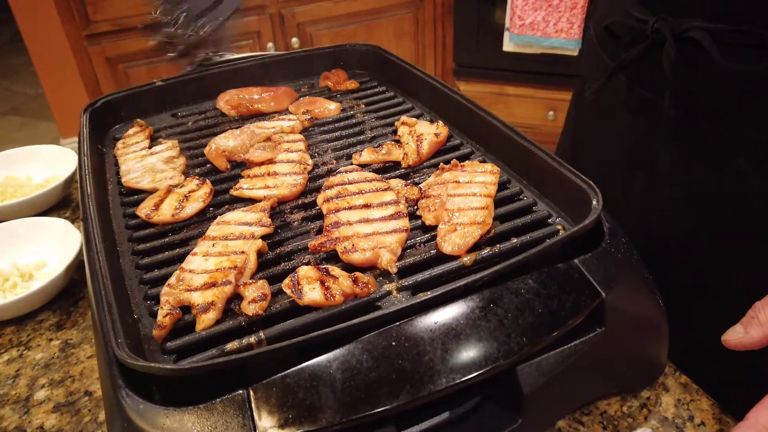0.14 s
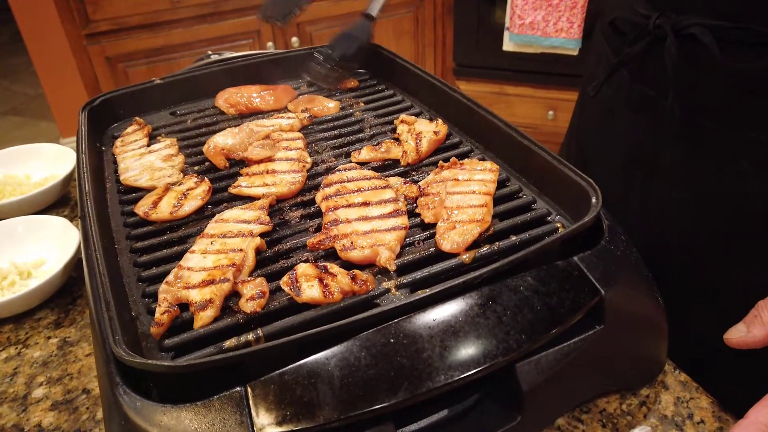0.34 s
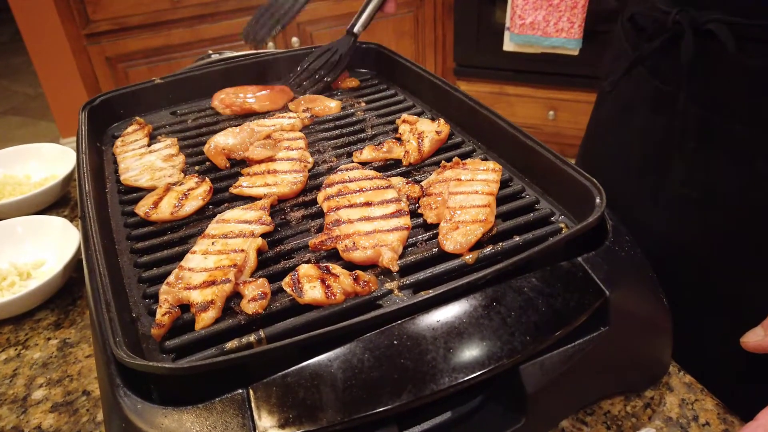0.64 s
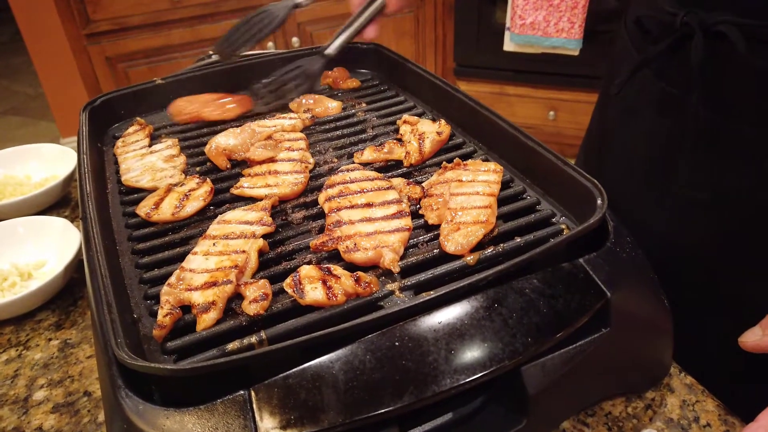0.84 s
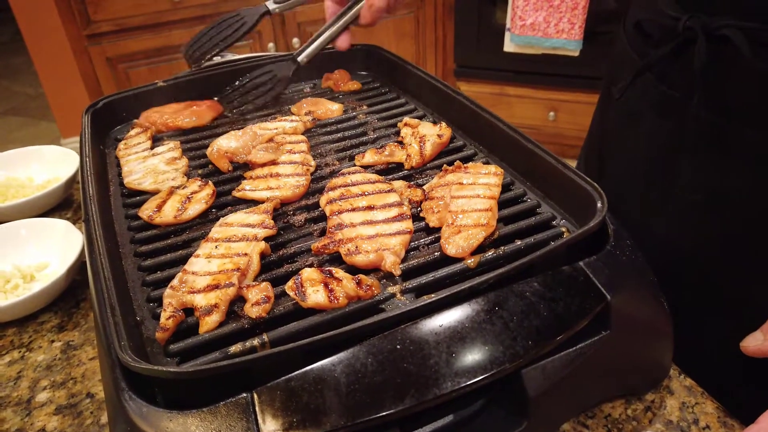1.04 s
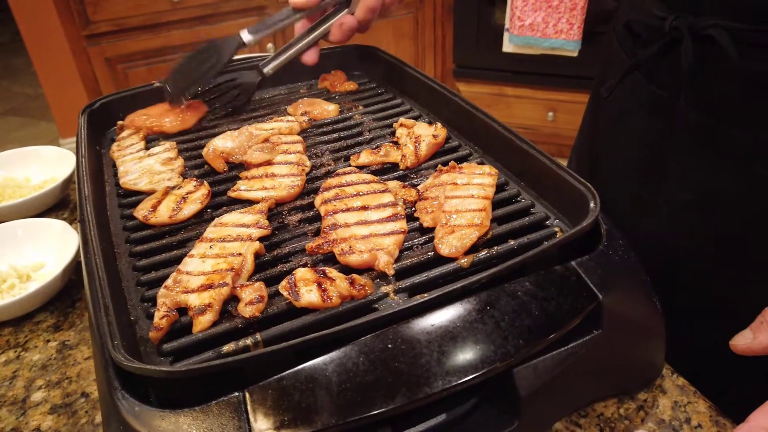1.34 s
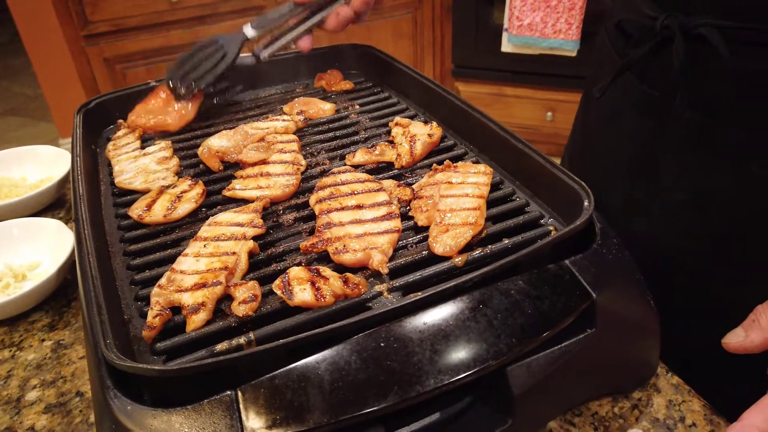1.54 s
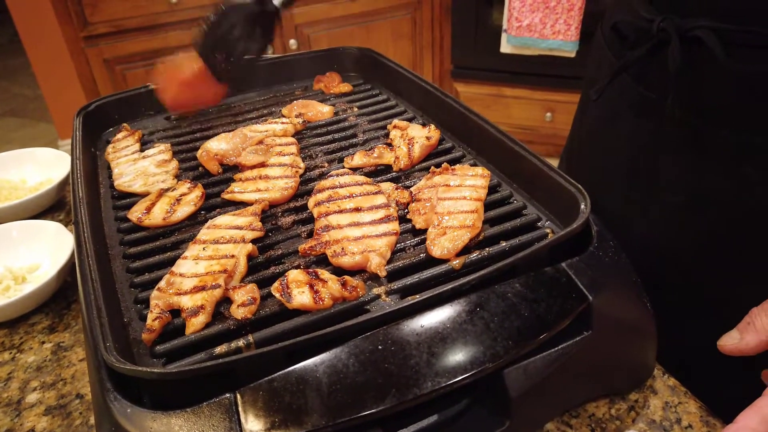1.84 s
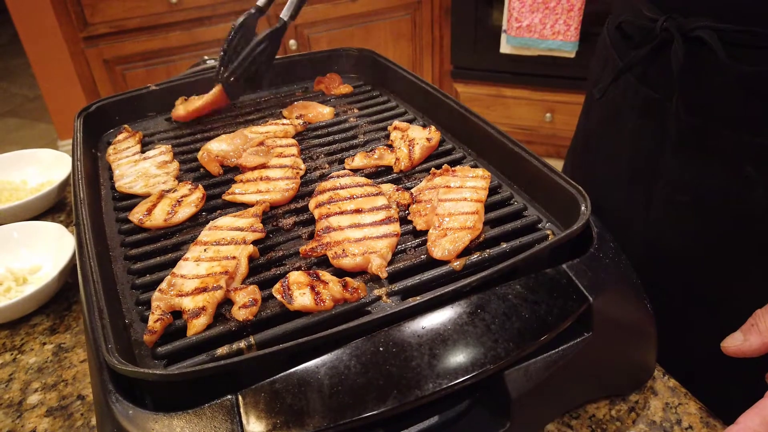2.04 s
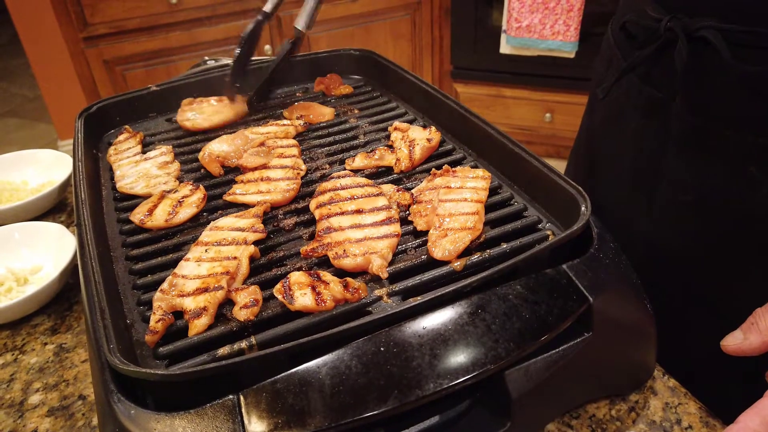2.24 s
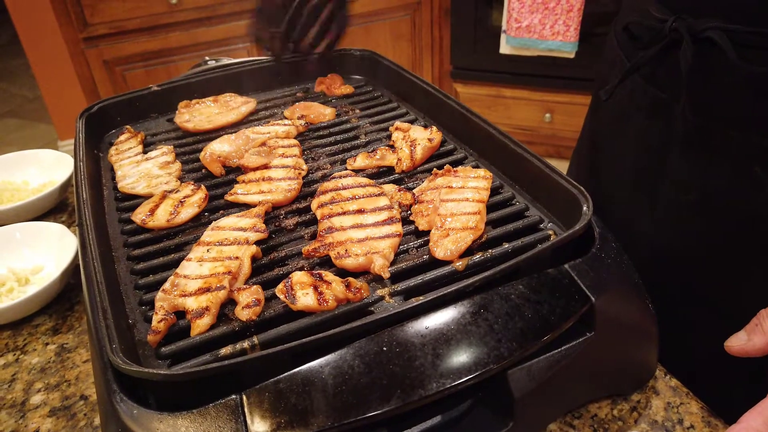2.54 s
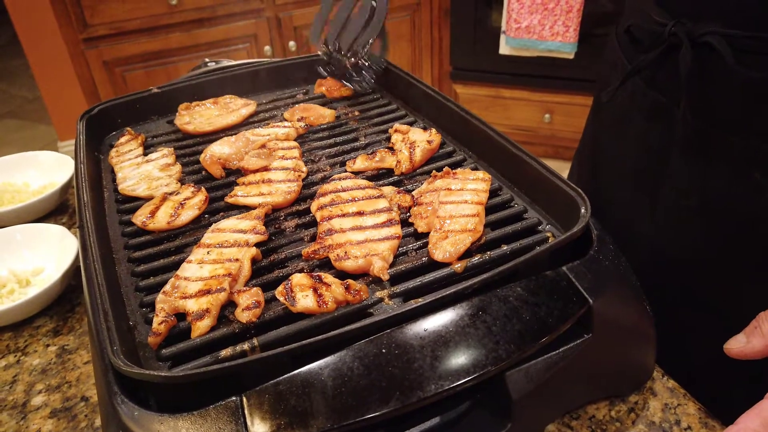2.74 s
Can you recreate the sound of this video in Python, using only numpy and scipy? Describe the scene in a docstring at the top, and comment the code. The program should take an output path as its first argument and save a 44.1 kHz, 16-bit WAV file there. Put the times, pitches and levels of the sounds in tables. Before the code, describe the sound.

Chicken sizzles steadily on a grill, with faint steam whistles as tongs turn a piece.

```python
"""Marinated chicken sizzles on a ribbed electric grill in a kitchen, almost in mono.
Countless tiny bubbles burst over a steam hiss while juice simmers in the grooves. Tongs push a wet
piece over the hot ribs and turn it; steam trapped under the meat escapes in fizzy, gliding whistles.
Drops of fat pop now and then, and appliances hum faintly behind it all."""
import sys
import numpy as np
from scipy import signal
from scipy.fft import rfft, irfft
from scipy.io import wavfile
from scipy.ndimage import uniform_filter1d

SR = 44100
rng = np.random.default_rng(int(sys.argv[2]) if len(sys.argv) > 2 else 0)


def to_wav(sig):
    """Store sig (one row per channel, or 1-D mono) as 16-bit WAV at the path in sys.argv[1].

    Samples outside -1..1 are clipped; the rate is SR.
    """
    pcm = np.clip(np.atleast_2d(sig), -1, 1) * 32767
    pcm = np.round(pcm).astype(np.int16)
    wavfile.write(sys.argv[1], SR, pcm.T)  # frames by channels


N = 127890
T = np.arange(N) / SR
HZ = np.fft.rfftfreq(N, 1 / SR)

# Tone of the sizzling fat: frequency_hz, gain_db
SIZZLE_TONE = [(1120, -25.5), (1900, -11), (2970, -8.5), (3870, -9), (4150, -8), (4490, -8.5), (5080, -8.5),
               (5500, -5.5), (5950, -4), (7680, -5), (8760, -3.5), (11800, -8.5), (15500, -13)]
# Loudness of the sizzle: time_s, level_db
SIZZLE_LEVEL = [(0, -36.5), (.25, -37.5), (.75, -37), (1.0, -35.5), (1.35, -35), (1.6, -34.5), (1.85, -36),
                (2.03, -35), (2.3, -36), (2.58, -35), (2.9, -35.5)]
# Brightness of the sizzle, highest while fresh marinade meets the plate: time_s, tilt_db_per_octave
SIZZLE_BRIGHTNESS = [(0, 0), (.8, -0.5), (1.3, -0.9), (1.7, -0.4), (2.05, -0.5), (2.35, -1.1), (2.9, -1.4)]
# Tone of the simmering juice, with the room's rumble: frequency_hz, gain_db
SIMMER_TONE = [(15, -45), (25, -17), (54, -23), (86, -18.5), (120, -10), (160, -12.5), (227, -12.5),
               (267, -4.5), (400, -3), (544, -1.5), (653, 2), (756, 2), (958, -.5), (1100, 0), (1260, -6.5),
               (1510, 1), (1950, -8.5)]
# Loudness of the simmer: time_s, level_db
SIMMER_LOUDNESS = [(0, -44), (.25, -46), (.7, -45.5), (.9, -44.5), (1.1, -45), (1.35, -44), (1.8, -43.5),
                   (2.2, -44), (2.55, -44.5), (2.9, -44)]
# Notes at which the grill plate rings: pitch_hz, width_hz, gain_db
PLATE_NOTES = [(444, 52, 4), (634, 70, 3), (871, 49, 8), (973, 64, 6.5), (1467, 60, -2), (1600, 56, -2)]
# Steam under the piece being pushed: time_s, pitch_hz, level_db
PUSHED_WHISTLE = [(1.0, 3450, -54), (1.017, 3420, -42), (1.065, 3330, -44), (1.10, 3250, -46),
                  (1.135, 3060, -46), (1.15, 3070, -38), (1.19, 3140, -39), (1.27, 3320, -40.5),
                  (1.38, 3210, -38.5), (1.47, 3180, -43.5), (1.53, 3060, -40.5), (1.62, 2980, -43),
                  (1.675, 2740, -40.5), (1.71, 2660, -44.5), (1.76, 2560, -50), (1.84, 2600, -56)]
# Steam under that piece once it is laid down again: time_s, pitch_hz, level_db
SETTLING_WHISTLE = [(2.365, 3300, -54), (2.388, 3300, -43.5), (2.46, 3370, -48), (2.6, 3360, -45.5),
                    (2.75, 3000, -47.5), (2.81, 2900, -43.5), (2.9, 3200, -51)]
# Steam seeping from under the resting meat: time_s, pitch_hz, level_db
RESTING_WHISTLE = [(0, 6070, -51), (.22, 5970, -50), (.33, 6080, -41), (.405, 6050, -43),
                   (.44, 5940, -38.5), (.485, 6100, -43), (.56, 6300, -44.5), (.68, 5880, -48.5),
                   (.92, 5850, -45), (1.15, 6100, -55)]
# Short jets of steam: start_s, length_s, pitch_hz, filter_width_hz, level_db
STEAM_JETS = [(0, 0.19, 8730, 1000, -45), (1.18, 0.23, 8400, 1400, -45), (1.193, 0.456, 9600, 1720, -46),
              (1.32, 0.376, 7040, 1900, -41.5), (1.332, 0.097, 6400, 1100, -40.5),
              (1.484, .06, 7400, 2200, -36), (1.544, 0.13, 3520, 900, -46), (1.55, 0.1, 4350, 1700, -43),
              (1.98, 0.17, 2980, 1200, -46), (1.91, 0.29, 5600, 900, -49.5)]
# Larger pops of fat: start_s, peak_before_echo_db, pitch_hz
FAT_POPS = [(0.3173, -22, 6900), (1.263, -19.5, 3130), (1.273, -22, 3180), (1.4567, -21, 6900),
            (1.678, -22, 2780), (1.674, -25, 7240), (2.067, -31, 7200), (2.153, -20, 7100),
            (2.181, -28, 6000)]
# Meat and tongs bumping the plate: start_s, peak_db
PLATE_BUMPS = [(.845, -38), (1.314, -37), (2.008, -31.5), (2.18, -37), (2.865, -33.5)]
# Dull thuds of handling: start_s, pitch_hz, level_db
DULL_THUDS = [(.088, 65, -58), (.24, 172, -56), (.77, 65, -61), (.83, 85, -54)]
# The tongs squeaking as they open: middle_s, pitch_hz, level_db
TONG_SQUEAKS = [(.302, 972, -49), (.34, 950, -39)]
# Hum of mains-powered appliances: pitch_hz, level_db
HUM_TONES = [(60, -80.5), (120, -70), (199, -73.5)]
# Tone of a very faint stereo width added to an otherwise mono sound: frequency_hz, gain_db
FAINT_WIDTH_TONE = [(30, -14), (100, -28), (250, -65), (3000, -68), (6000, -71), (12000, -55.5)]


def sizzle(spits_per_s=100, patch_db=0.63, flutter_db=0.44, tilt_pivot_hz=7000):
    """Tiny bursts and sharp spits over a steam hiss; patches of the plate flare up and calm down."""
    bursts = bubbles(per_s=6000, spread_db=3.0, low_hz=2150, high_hz=14800, cycles=2.74)
    spits = normalize(rng.uniform(-0.45, 1, N) * (rng.random(N) < spits_per_s / SR))
    sound = amp(-5) * kitchen_echo(bursts) + amp(-24.5) * spits
    sound += amp(-2.5) * rng.standard_normal(N)  # hiss
    # Split the sound into a grid of pitch and time, so each patch can swell by itself.
    hz, times, grid = signal.stft(shape_tone(sound, SIZZLE_TONE), SR, nperseg=512, noverlap=384)
    patches = uniform_filter1d(rng.standard_normal(grid.shape), size=9, axis=0)
    patches = normalize(uniform_filter1d(patches, size=18, axis=1))
    octaves = np.log2(np.maximum(hz, 1000) / tilt_pivot_hz)
    tilt_db = octaves[:, None] * curve(SIZZLE_BRIGHTNESS, times)
    grid *= amp(patch_db * patches + tilt_db)
    sound = signal.istft(grid, SR, nperseg=512, noverlap=384)[1][:N]
    return normalize(sound) * amp(curve(SIZZLE_LEVEL) + flutter_db * wander(rate_hz=28))


def bubbles(per_s, spread_db, low_hz, high_hz, cycles, sizes=24):
    """Each bursting bubble rings very briefly; smaller bubbles ring higher."""
    out = np.zeros(N)
    for hz in np.geomspace(low_hz, high_hz, sizes):
        rings = resonate(clicks(per_s / sizes, spread_db), hz, width_hz=hz / cycles)
        out += normalize(rings) * np.sqrt(hz)
    return normalize(out)


def simmer(blips_per_s=1200, spread_db=2.5, top_hz=1740, flutter_db=0.1):
    """Larger bubbles burst in the juice in the grooves and also make the plate ring."""
    blips = kitchen_echo(bubbles(blips_per_s, spread_db, low_hz=182, high_hz=1900, cycles=2.12))
    wash = rng.standard_normal(N)
    juice = shape_tone(amp(-14) * blips + amp(-4) * wash, SIMMER_TONE)
    juice = normalize(signal.sosfilt(signal.butter(6, top_hz, fs=SR, output="sos"), juice))
    ring = normalize(plate_ring(clicks(blips_per_s, spread_db)))
    level_db = curve(SIMMER_LOUDNESS) + flutter_db * wander(rate_hz=18)
    return normalize(juice + amp(-4) * ring) * amp(level_db)


def plate_ring(taps):
    """The grill plate answers each tap with a few notes that die away fast."""
    return sum(amp(db) * resonate(taps, hz, width_hz) for hz, width_hz, db in PLATE_NOTES)


def steam_whistle(path, band_width_hz=820, sputter_db=1.0):
    """Steam sputters out from under the meat; its pitch glides as the gap changes."""
    pitch_hz = curve(path)
    puffs = clicks(per_s=9000, spread_db=1.7) * amp(sputter_db * wander(rate_hz=230))
    # Shift the pitch down to zero, filter, and shift back: only a band around the pitch is left.
    spin = np.exp(2j * np.pi * np.cumsum(pitch_hz) / SR)
    low_pass = signal.butter(3, band_width_hz / 2, fs=SR, output="sos")
    band = (signal.sosfilt(low_pass, puffs / spin) * spin).real
    core = steam(pitch_hz, filter_width_hz=450, sputter_db=0.4)
    whistle = normalize(normalize(band) + amp(-2.5) * core)
    sounding = (T > path[0][0]) & (T < path[-1][0])
    return whistle * amp(curve(path, column=2)) * sounding


def steam_jets(fade_s=0.027):
    """Short jets of escaping steam, each fading in and out."""
    out = np.zeros(N)
    for start_s, length_s, hz, width_hz, db in STEAM_JETS:
        to_edge_s = np.minimum(T - start_s, start_s + length_s - T)
        fade = np.clip(to_edge_s / min(fade_s, length_s / 2), 0, 1)
        out += amp(db) * fade * steam(hz, width_hz)
    return out


def steam(hz, filter_width_hz, sputter_db=2.9):
    """Tiny puffs stream through a narrow wet gap, which rings around one pitch."""
    puffs = clicks(per_s=8000, spread_db=1) * amp(sputter_db * wander(rate_hz=210))
    for _ in range(3):  # each pass narrows the band
        puffs = resonate(puffs, hz, filter_width_hz)
    return normalize(puffs)


def fat_pops(decay_s=0.0011):
    """Single drops of fat burst in a short spray."""
    out, t = np.zeros(N), T[:SR // 20]
    for start_s, db, hz in FAT_POPS:
        spray = rng.standard_normal(len(t)) * np.exp(-t / decay_s)
        pop = resonate(spray, hz, width_hz=850)
        add(out, start_s, amp(db) * pop / abs(pop).max())
    return out


def bumps_and_thuds(bump_decay_s=0.017, thud_rise_s=0.008):
    """Moving the meat makes soft bumps that ring the plate, and low, dull thuds."""
    out, t = np.zeros(N), T[:SR // 3]
    for start_s, db in PLATE_BUMPS:
        ring = plate_ring(rng.standard_normal(len(t)) * np.exp(-t / bump_decay_s))
        add(out, start_s, amp(db) * ring / abs(ring).max())
    swell = t / thud_rise_s * np.exp(1 - t / thud_rise_s)
    for start_s, hz, db in DULL_THUDS:
        add(out, start_s, amp(db) * swell * np.sin(2 * np.pi * hz * t))
    return out


def tong_squeaks(swell_s=0.016, overtone_ratio=1.58):
    """The tongs squeak softly as they open: a short note with a weaker, higher one."""
    out = np.zeros(N)
    for middle_s, hz, db in TONG_SQUEAKS:
        phase = 2 * np.pi * hz * T
        tone = np.sin(phase) + amp(-6) * np.sin(overtone_ratio * phase)
        swell = np.exp(-((T - middle_s) / swell_s) ** 2)
        out += amp(db) * swell * tone
    return out


def appliance_hum(waver_db=1.6):
    """The kitchen's appliances hum in faint, low, wavering tones."""
    out = np.zeros(N)
    for hz, db in HUM_TONES:
        peak = np.sqrt(2) * amp(db + waver_db * wander(rate_hz=2.8))
        out += peak * np.sin(2 * np.pi * (hz * T + rng.random()))
    return out


def kitchen_echo(sound, spots=4, fade_60db_s=0.26, echo_db=-2):
    """The sound hops between spots on the plate, and the room gives each its own short echo."""
    t, echo = T[:SR // 3], np.zeros(N)
    active_spot = rng.integers(0, spots, N // 64 + 1).repeat(64)[:N]
    for spot in range(spots):
        tail = rng.standard_normal(len(t)) * amp(-60 * t / fade_60db_s) * (t > .003)
        share = np.sqrt(abs(uniform_filter1d((active_spot == spot) * 1., size=64)))  # smooth hops
        echo += signal.fftconvolve(sound * share, tail / np.linalg.norm(tail))[:N]
    return (sound + amp(echo_db) * echo) / np.hypot(1, amp(echo_db))


def clicks(per_s, spread_db):
    """Random clicks, many small and a few large."""
    size = amp(spread_db * np.minimum(rng.exponential(1, N), 5))
    return normalize(size * rng.choice([-1, 1], N) * (rng.random(N) < per_s / SR))


def resonate(sound, hz, width_hz):
    """Makes a sound ring at a steady or gliding pitch; a smaller width rings longer."""
    spin = np.exp(2j * np.pi * np.cumsum(hz * np.ones(len(sound))) / SR)
    decay = np.exp(-np.pi * width_hz / SR)
    return 2 * (spin * signal.lfilter([1 - decay], [1, -decay], sound / spin + 1e-18)).real


def wander(rate_hz):
    """A smooth random wobble, mostly slower than rate_hz."""
    spectrum = rfft(rng.standard_normal(N)) * (HZ > 1)
    return normalize(irfft(spectrum / (1 + (HZ / rate_hz) ** 2), N))


def shape_tone(sound, points):
    """Turns frequencies up or down along a line through the given points."""
    hz, db = np.transpose(points)
    gain = amp(np.interp(np.log(HZ + 1), np.log(hz + 1), db))
    return irfft(rfft(sound) * gain, N)


def curve(rows, times=T, column=1):
    """Joins the values in one column of a time table with straight lines."""
    rows = np.array(rows)
    return np.interp(times, rows[:, 0], rows[:, column])


def add(mix, start_s, sound):
    """Mixes a sound in at its start time."""
    part = mix[round(start_s * SR):][:len(sound)]
    part += sound[:len(part)]


def amp(db):
    """Turns decibels into a number to multiply by."""
    return 10 ** (np.asarray(db) / 20)


def normalize(sound):
    """Scales a sound to an average strength (rms) of 1."""
    return sound / np.sqrt(np.mean(sound ** 2) + 1e-20)


def scene():
    """Everything sits in the middle, with only a trace of stereo width."""
    frying = sizzle() + simmer()
    whistles = sum(steam_whistle(path) for path in (PUSHED_WHISTLE, SETTLING_WHISTLE, RESTING_WHISTLE))
    middle = frying + whistles + steam_jets() + kitchen_echo(fat_pops())
    middle += bumps_and_thuds() + tong_squeaks() + appliance_hum()
    side = shape_tone(np.roll(frying, N // 2), FAINT_WIDTH_TONE)  # time-shifted, so unlike the middle
    return np.array([middle + side, middle - side])


def record(dry):
    """Cuts off the very highest treble."""
    low_pass = signal.firwin(801, cutoff=15660, window=("kaiser", 9), fs=SR)
    return signal.oaconvolve(dry, low_pass[None], "same")


dry = scene()
out = record(dry)
to_wav(out)
```